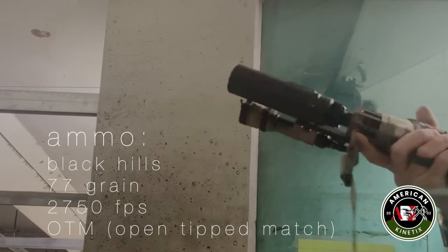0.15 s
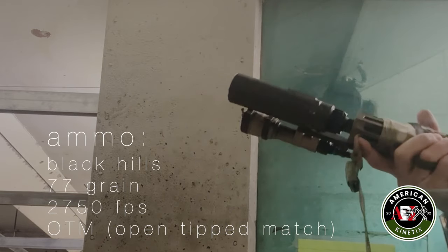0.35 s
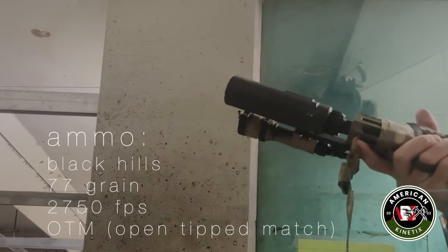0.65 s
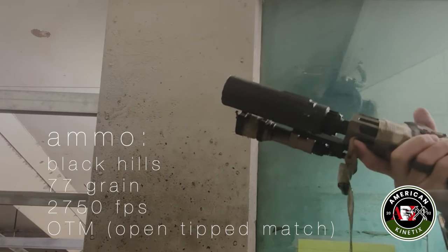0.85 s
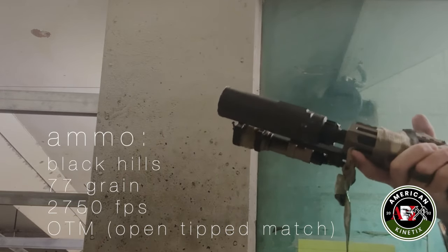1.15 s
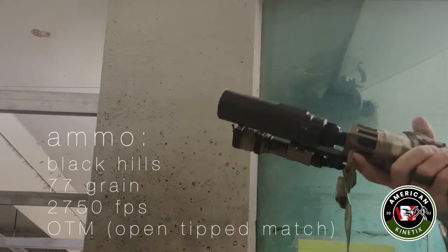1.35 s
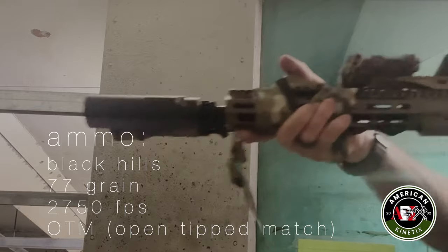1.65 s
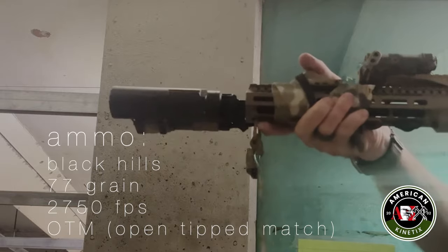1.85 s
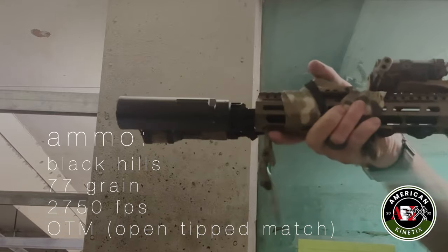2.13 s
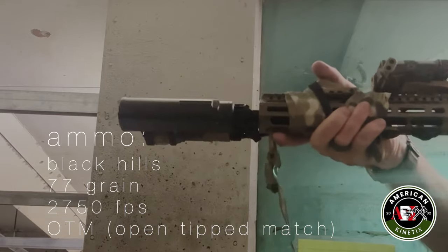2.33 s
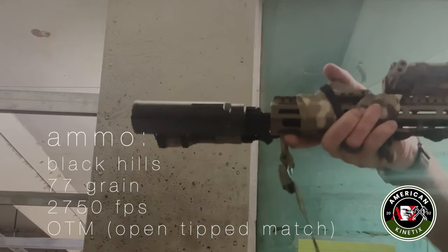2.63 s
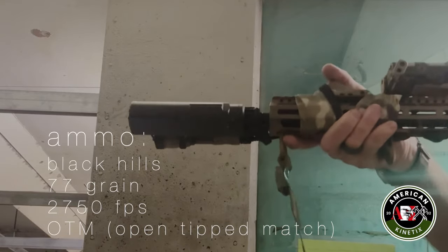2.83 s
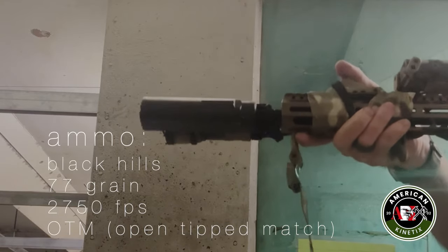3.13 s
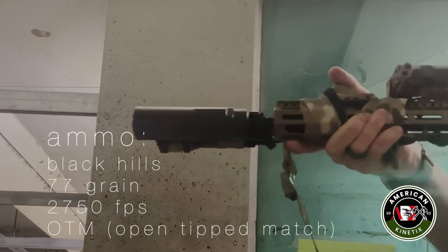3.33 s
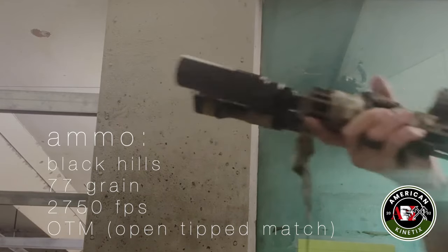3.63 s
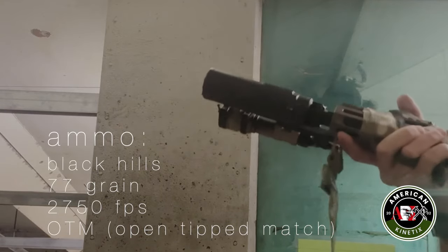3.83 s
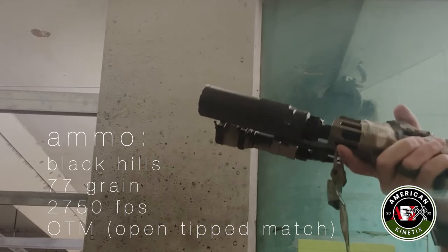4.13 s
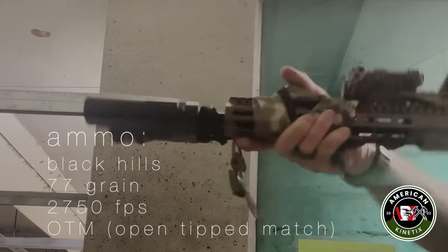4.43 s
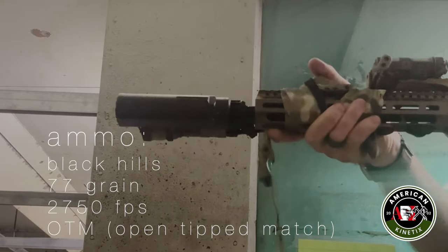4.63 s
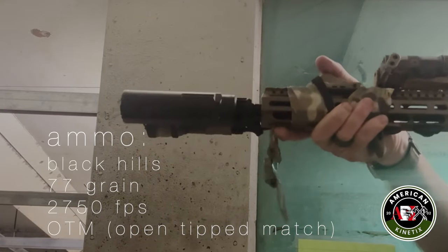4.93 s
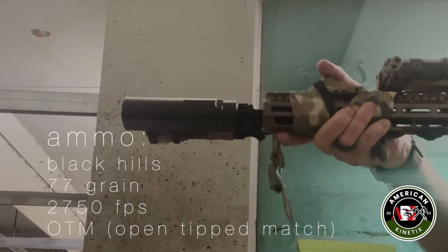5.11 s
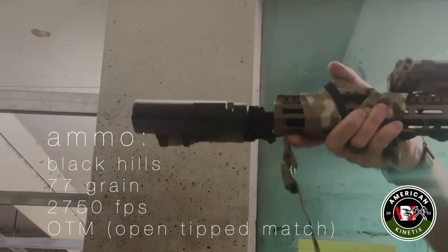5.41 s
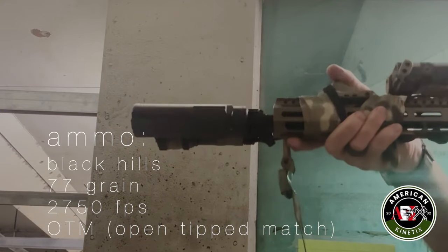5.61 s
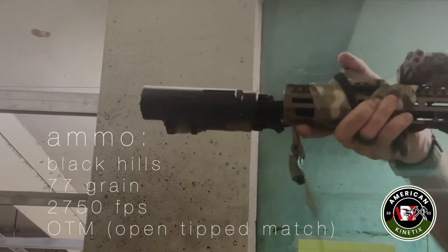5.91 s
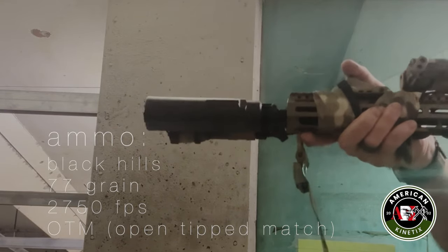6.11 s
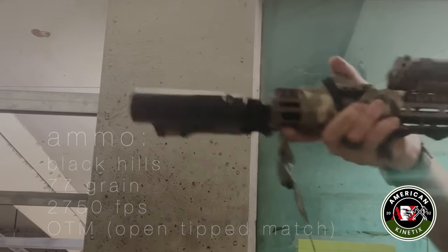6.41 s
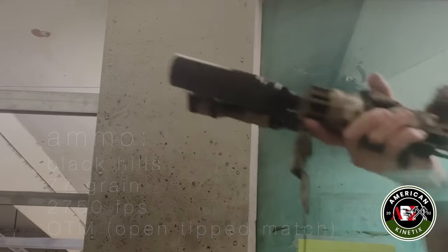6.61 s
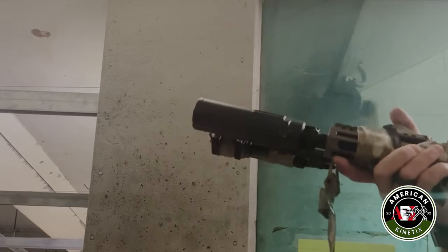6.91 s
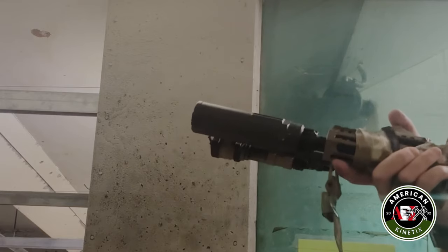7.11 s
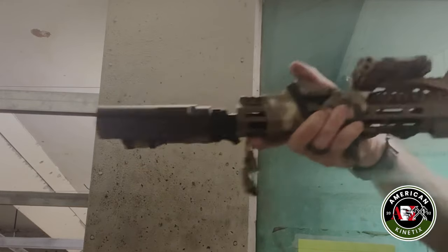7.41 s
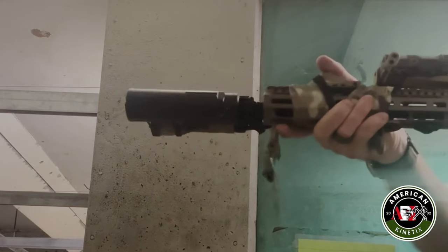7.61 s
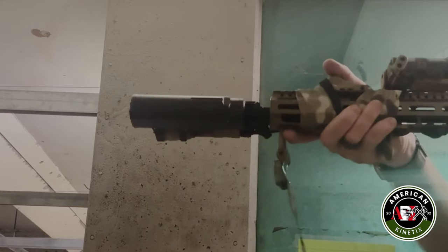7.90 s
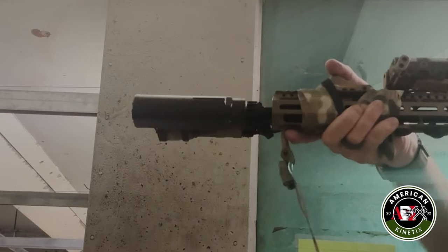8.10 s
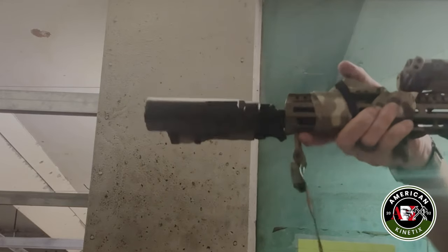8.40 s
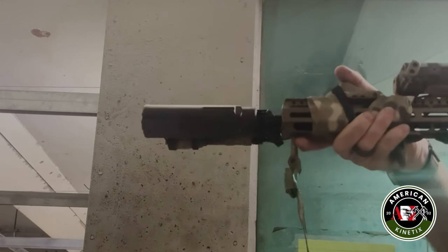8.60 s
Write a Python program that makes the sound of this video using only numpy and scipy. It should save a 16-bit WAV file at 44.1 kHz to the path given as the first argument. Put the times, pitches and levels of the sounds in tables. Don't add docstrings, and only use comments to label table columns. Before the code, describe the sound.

Steady ventilation rumbles and hisses with a thin motor hum in a long, hard-walled indoor range. At the start the echo of a just-fired shot is still dying as a brass case tinkles in three quick bounces. A low gear thud comes at 1.5 s, with tiny clicks just after. A suppressed rifle fires at 2.4 and again at 2.9 s: each shot opens with a burst of hissing gas and a swelling bullet crack, then about a tenth of a second later a heavy slap returns from the backstop and rings through the hall for a couple of seconds. Cases ping high around 3.6 to 3.9 s, with a dry tick at 4.2. A second pair comes at 5.2 and 5.8 s, a bright ring just before the latter. Cases ring and tick from 6.6 to 7.6 s. A last shot fires at 8.2, and brass rings at 8.7 inside its echo, cut off at the end.

```python
import sys
import numpy as np
from scipy import signal
from scipy.io import wavfile
from scipy.ndimage import uniform_filter1d

SR = 44100
rng = np.random.default_rng(int(sys.argv[2]) if len(sys.argv) > 2 else 0)


def magnitude_from_level(level_db):
    exponent = np.asarray(level_db, float) / 20
    return 10 ** exponent


def transcribe(u):
    v = np.clip(np.atleast_2d(u).T, -1, 1)
    q = np.round(v * 32767).astype(np.int16)
    wavfile.write(sys.argv[1], SR, q)


N = 385875

HZ = np.fft.rfftfreq(512, 1 / SR)
SLAP_S = .1175
LEAD_S = .02
CASE_HZ, SHORT_CASE_HZ, RING_T60 = 14970, 15220, .26


def evened(x):
    return x / np.sqrt(np.mean(abs(x) ** 2) + 1e-20)


def read(points, hz):
    f, value = np.transpose(points)
    return np.interp(np.log(hz + 1), np.log(f + 1), value)[:, None]


def add(mix, s, sound):
    at = round(s * SR)
    sound = sound[:, max(-at, 0):]
    part = mix[:, max(at, 0):][:, :sound.shape[1]]
    part += sound[:, :part.shape[1]]


def cut(x, hz, kind, order):
    return signal.sosfilt(signal.butter(order, hz, kind, fs=SR, output="sos"), x)


def chance(frames, size):
    z = rng.standard_normal((2, 2, frames, size), dtype=np.float32)
    return (z[0] + 1j * z[1]).transpose(0, 2, 1) / np.sqrt(2)


def at_ports(z, hz):
    # (frequency [Hz], side minus mid [dB])
    width = [(40, -14), (130, -9), (300, -3), (650, 3), (1300, 1), (2100, -6), (2900, -2), (4500, -2),
             (6500, 3.5), (7600, 12), (9200, 9), (10400, 2), (13000, -14), (15500, -2)]
    # (frequency [Hz], left minus right [dB])
    balance = [(100, -.5), (400, 0), (1200, 3.5), (2200, 1), (3000, -1), (5200, -2.5), (6800, 0),
               (16000, 0)]
    side_gain = magnitude_from_level(read(width, hz))
    whole = np.sqrt(1 + side_gain ** 2)
    mid = z[0] / whole
    side = z[1] * side_gain / whole
    tilt = magnitude_from_level(read(balance, hz) / 2)
    return np.array([(mid + side) * tilt, (mid - side) / tilt])


def wave(z, field):
    return signal.istft(at_ports(z, HZ) * field, window="cosine", nperseg=512, noverlap=256)[1] / 14.4


def colour(points, db):
    return magnitude_from_level(db) * evened(magnitude_from_level(read(points, HZ)))


def ventilation():
    # (frequency [Hz], level per Hz [dB])
    fan = [(50, -6), (80, 2), (105, -4), (160, -5), (250, -10), (400, -12), (650, -7), (1000, -10),
           (1400, -16), (2100, -14.5), (2700, -18), (3300, -31), (5000, -42), (12000, -47)]
    fan_db, hum_hz, hum_db = -55.3, 121, -63
    frames, hz = N // 1024 + 5, np.fft.rfftfreq(2048, 1 / SR)
    patches = rng.standard_normal((frames, len(hz)))
    patches = uniform_filter1d(uniform_filter1d(patches, size=3, axis=0), size=12, axis=1)
    patch_db = evened(patches).T * read([(100, 2.0), (1000, 1.2)], hz)
    spectra = at_ports(chance(frames, len(hz)), hz) * magnitude_from_level(read(fan, hz) + patch_db)
    air = signal.istft(spectra, window="cosine", nperseg=2048, noverlap=1024)[1]
    hum = np.sin(2 * np.pi * hum_hz * np.arange(N) / SR)
    return magnitude_from_level(fan_db) * evened(air[:, :N]) + magnitude_from_level(hum_db) * hum


def muzzle_gas(t, pop_db):
    # (frequency [Hz], level [dB])
    gas = [(40, -12), (110, 5), (230, -4), (600, -5.5), (1050, -5), (1450, -8), (2200, -1), (4000, -8),
           (6000, -8), (9000, -14), (12500, -6), (16000, -8)]
    # (frequency [Hz], time to fall 60 dB [s])
    gas_t60 = [(70, 1.2), (200, .6), (700, .6), (1500, 1.0), (5000, 1.1), (12000, .9), (16000, .6)]
    below_hiss = (HZ < 8000)[:, None]
    return colour(gas, -18.5) * magnitude_from_level(pop_db * below_hiss) * magnitude_from_level(-60 * t / read(gas_t60, HZ))


def bullet_crack(t, fading):
    # (frequency [Hz], level [dB])
    crack = [(400, -18), (1100, -12), (1500, -13), (2300, 0), (3200, -6), (6000, -10), (10000, -26)]
    build_up = .11
    return colour(crack, -17) * np.minimum(t / build_up, 1) ** 1.2 * fading


def backstop_slap(t, fading):
    # (frequency [Hz], level [dB])
    slap = [(75, .5), (150, 0), (350, 1), (650, 1), (1100, -1), (1500, -3), (1850, -1), (2250, 1.8),
            (2800, -2.5), (3800, -9.5), (6500, -13.5), (9500, -18), (13000, -11.5), (16000, -19)]
    # (frequency [Hz], time [s])
    slap_rise = [(80, .02), (300, .01), (1000, .002), (10000, .008)]
    rising = 1 - np.exp(-np.maximum(t - SLAP_S, 0) / read(slap_rise, HZ))
    return colour(slap, -10.6) * rising * fading


def hall_fading(t):
    # (frequency [Hz], time to fall 60 dB [s])
    hall_t60 = [(60, 1.6), (150, 1.9), (500, 2.5), (1200, 2.5), (2200, 2.35), (3500, 2.0), (6000, 1.55),
                (9000, 1.1), (12000, .87), (15000, .5)]
    far_db, far_stretch = -27, 1.8
    hall = read(hall_t60, HZ)
    return np.hypot(magnitude_from_level(-60 * t / hall), magnitude_from_level(far_db - 60 * t / (hall * far_stretch)))


def hall_echoes(pattern, t):
    # (frequency [Hz], share of the echo pattern common to all [0-1])
    repeat = [(300, .95), (1500, .6), (5000, .2)]
    # (frequency [Hz], side against the diffuse width [dB])
    side_near = [(80, 14), (300, 9), (1000, 10), (2500, 7), (5000, 3), (9000, -1), (13000, 5), (15000, 1)]
    # (frequency [Hz], side against the diffuse width [dB])
    side_late = [(80, -22), (130, -18), (250, -9), (450, -4), (700, -1), (1000, 0)]
    # (frequency [Hz], time [s])
    side_settle = [(100, .14), (400, .1), (800, .035), (2000, .02)]
    # (frequency [Hz], extra side [dB])
    slap_side = [(150, 0), (300, 6), (550, 9), (850, 2), (1200, 0)]
    # (frequency [Hz], share of side a quarter turn ahead of mid [0-1])
    quarter_turn = [(130, 0), (300, .6), (550, .6), (900, .3), (1300, 0)]
    slap_settle, clump_db = .09, 1.5

    share = np.clip(read(repeat, HZ), 0, 1)
    z = share * pattern + np.sqrt(1 - share ** 2) * chance(len(t), len(HZ))
    slapped = t > SLAP_S
    quarter = np.clip(read(quarter_turn, HZ), 0, 1) * slapped
    z[1] = 1j * quarter * z[0] + np.sqrt(1 - quarter ** 2) * z[1]
    z[1] *= magnitude_from_level(read(slap_side, HZ) * slapped * np.exp(-abs(t - SLAP_S) / slap_settle))
    settling = np.exp(-t / read(side_settle, HZ))
    z[1] *= magnitude_from_level(read(side_near, HZ) * settling + read(side_late, HZ) * (1 - settling))
    clumps = uniform_filter1d(uniform_filter1d(z[0].real, size=9, axis=0), size=2, axis=1)
    z *= magnitude_from_level(clump_db * evened(clumps)[:, ::-1] * np.exp(-t / .5) - .15)
    return z


def add_slap_echoes(out):
    # (time after the slap [s], left level [dB], right level [dB])
    slap_echoes = [
        (.0025, -3, -14),
        (.006, -1, -9),
        (.0165, -5, -7),
        (.0355, -5, -7),
        (.0515, -7, -8),
    ]
    t = np.arange(400) / SR
    swing = np.sin(2 * np.pi * 750 * t) * np.exp(-t / .0016)
    for s, left_db, right_db in slap_echoes:
        add(out, SLAP_S + s, swing * magnitude_from_level([[left_db], [right_db]]) * [[1], [-1]])


def shot(pattern, pop_db):
    t = np.arange(pattern.shape[-1]) * 256 / SR
    z = hall_echoes(pattern, t)
    fading = hall_fading(t)
    muzzle = muzzle_gas(t, pop_db)
    crack = bullet_crack(t, fading)
    slap = backstop_slap(t, fading)
    out = wave(z, np.sqrt(muzzle ** 2 + crack ** 2 + slap ** 2))
    lead = cut(cut(out[:, :round(LEAD_S * SR)], 5600, "low", order=8), 450, "high", order=2)
    lead = magnitude_from_level(-15) * lead * np.linspace(0, 1, lead.shape[1]) ** 1.5
    out *= 1 - np.exp(-np.arange(out.shape[1]) / (.0007 * SR))
    add_slap_echoes(out)
    return np.hstack([lead, out])


def add_shots(mix):
    # (time [s], charge level [dB])
    shots = [
        (-.74, 0),
        (2.3612, 0),
        (2.9215, -.7),
        (5.2175, 0),
        (5.8135, -.7),
        (8.2200, 0),
    ]
    duck_db, duck_s = -3.5, .25
    follow_s, follow_db = 1, -1.5
    pattern = chance(500, len(HZ))
    last, t = -np.inf, np.arange(N) / SR
    for s, db in shots:
        mix *= magnitude_from_level(duck_db * (t > s) * np.exp(-abs(t - s) / duck_s))
        pop_db = follow_db * (s - last < follow_s)
        add(mix, s - LEAD_S, magnitude_from_level(db) * shot(pattern, pop_db))
        last = s


def brass(db, hz, low_db, tick_db):
    t = np.arange(SR // 2) / SR
    phase = 2 * np.pi * rng.random((5, 1, 1)) + rng.uniform(1.1, 1.9, (5, 1, 1)) * [[0], [1]]

    def ring(f, k):
        return np.sin(2 * np.pi * f * t + phase[k])

    mouth = ring(hz, k=0) + .7 * ring(hz + rng.uniform(50, 120), k=1)
    mouth = mouth + .15 * ring(hz * 1.035, k=2) * magnitude_from_level(-300 * t)
    body = ring(hz * .707, k=3) + .5 * ring(hz * .707 + 60, k=4)
    puff, blur = rng.standard_normal((2, 2, len(t)))
    tick = (puff[0] + .5 * puff) * (np.exp(-t / .0008) + .06 * np.exp(-t / .02))
    tick = cut(tick, 8500, "high", order=2)
    blur = evened(uniform_filter1d(blur, size=150))
    fading = np.hypot(magnitude_from_level(-60 * t / RING_T60), magnitude_from_level(-15 - 60 * t / 1.1) * blur) * (1 - 2 * t)
    rings = .8 * (mouth + magnitude_from_level(low_db + 30 * t) * body) * fading
    return magnitude_from_level(db) * (rings + magnitude_from_level(tick_db) * tick)


def add_bounces(mix):
    # (time [s], mouth ring [dB], body ring against mouth [dB], 1 = the shorter case)
    bounces = [(.0278, -55, -18, 0), (.1121, -50, -16, 1), (.1895, -64, -14, 0), (3.5503, -46, -28, 0),
               (3.8072, -56, -28, 0), (3.8791, -72, 9, 0), (5.7164, -39, -18, 0), (6.6468, -38, -35, 0),
               (7.0549, -54, -32, 0), (7.3297, -45, -24, 1), (7.4111, -60, -5, 0), (7.5453, -63, -12, 0),
               (7.5682, -52, -20, 1), (8.735, -42, -20, 0)]
    flat_from_db, tick_per_flat = -14, 1.05
    for s, db, body_db, short in bounces:
        tick_db = -10 + tick_per_flat * max(body_db - flat_from_db, 0)
        hz = SHORT_CASE_HZ if short > .5 else CASE_HZ
        add(mix, s, brass(db, hz, body_db, tick_db))


def add_dead_drops(mix):
    # (time [s], tick level [dB])
    dead_drops = [
        (1.3494, -71),
        (1.6594, -71),
        (4.1724, -63),
        (6.8793, -70),
        (7.1751, -55),
    ]
    ring_db, body_db = -16, -12
    for s, db in dead_drops:
        add(mix, s, brass(db + ring_db, CASE_HZ, body_db, -ring_db))


def add_knocks(mix):
    # (time [s], level [dB], frequency [Hz], decay [s])
    knocks = [
        (1.535, -48, 230, .02),
        (1.657, -67, 4800, .002),
        (1.67, -71, 3800, .002),
        (7.412, -57, 4500, .002),
    ]
    t = np.arange(SR // 10) / SR
    for s, db, hz, decay in knocks:
        burst = cut(rng.standard_normal((2, len(t))), hz * 1.6, "low", order=2)
        burst = cut(burst, hz / 1.6, "high", order=2)
        add(mix, s, magnitude_from_level(db) * evened(burst) * np.exp(-t / decay))


def scene():
    mix = ventilation().astype(float)
    add_shots(mix)
    add_bounces(mix)
    add_dead_drops(mix)
    add_knocks(mix)
    return mix


def limited(dry):
    power_db = 10 * np.log10(abs(uniform_filter1d((dry ** 2).mean(axis=0), size=900)) + 1e-12)
    fall = np.arange(N) * 40. / SR
    over_db = np.maximum(np.maximum.accumulate(power_db + fall) - fall + 17, 0)
    slow = np.exp(-1 / (.03 * SR))
    return dry / magnitude_from_level(.33 * signal.lfilter([1 - slow], [1, -slow], over_db) - 1.5)


def thinned(left, right):
    frame = dict(window="cosine", nperseg=2048, noverlap=1024)
    hz, t, z = signal.stft([left + right, left - right], SR, **frame)
    starts = np.arange(0, len(hz), 16)
    power = np.add.reduceat(abs(z) ** 2, starts, axis=1) + 1e-20
    lead_db = 10 * np.log10(power / power[::-1])
    share_db = 10 * np.log10(power / power.sum(axis=(0, 1)) ** 1.3)
    share_db = share_db + 4.0 * rng.standard_normal(power.shape)
    heard = share_db + 3.2 * (15000 - hz[starts, None]) / 1000 > [[[-43]], [[-38]]]
    treble_db = 10 * np.log10(power[:, 28:].sum(axis=(0, 1)))
    attack = treble_db - np.roll(treble_db, 1) > 14
    keep = ((lead_db > -4.5) & heard | attack)[:, np.arange(len(hz)) // 16]
    keep = (keep | (hz < 6700)[:, None]) * (hz < 15800)[:, None]
    mid, side = signal.istft(z * keep, SR, **frame)[1][:, :N] / 2
    return np.array([mid + side, mid - side])


def top_cut(x):
    return signal.sosfilt(signal.butter(12, 16800, fs=SR, output="sos"), x)


def record(dry):
    held = cut(limited(dry), 48, "high", order=4)
    mix = thinned(*np.tanh(held / 1.3) * 1.3)
    return top_cut(mix)


dry = scene()
out = record(dry)
transcribe(out)
```